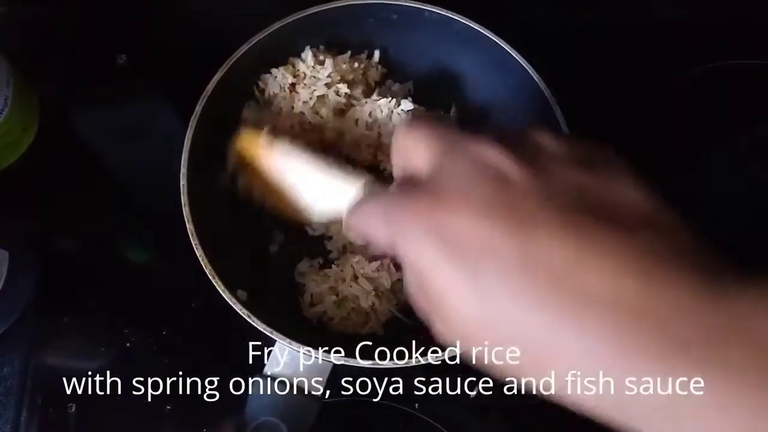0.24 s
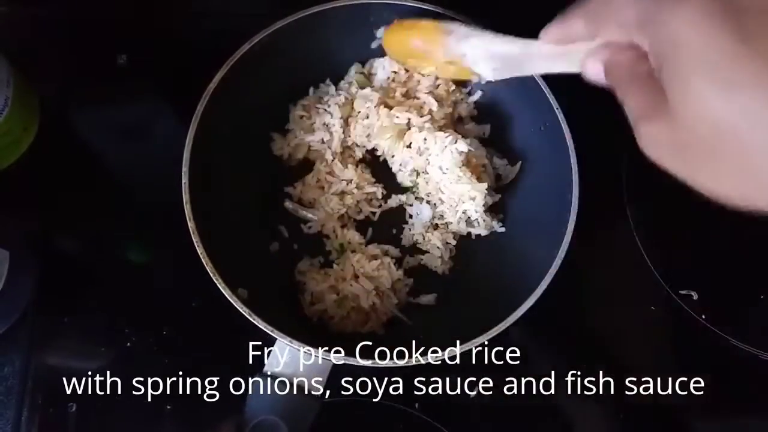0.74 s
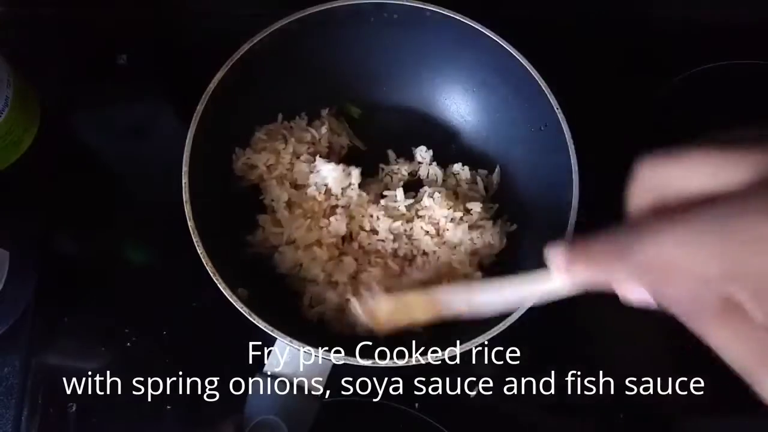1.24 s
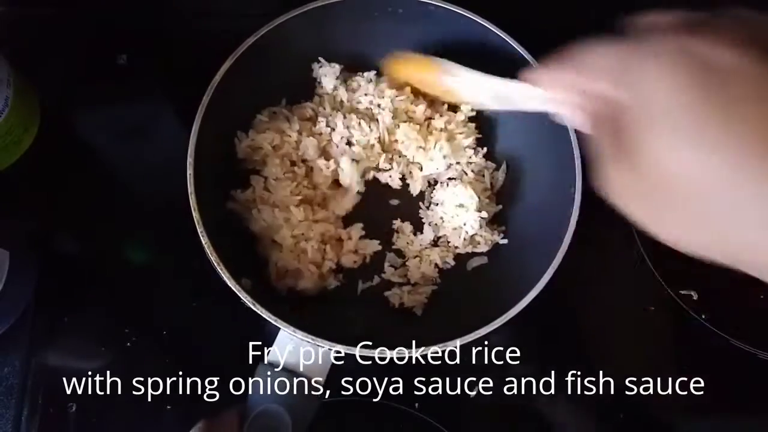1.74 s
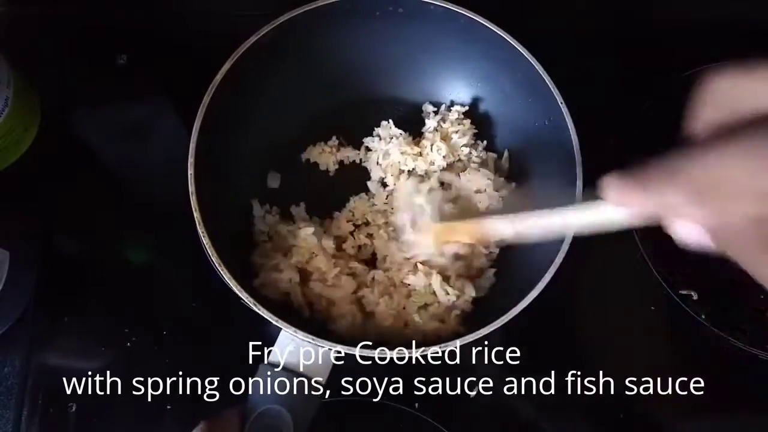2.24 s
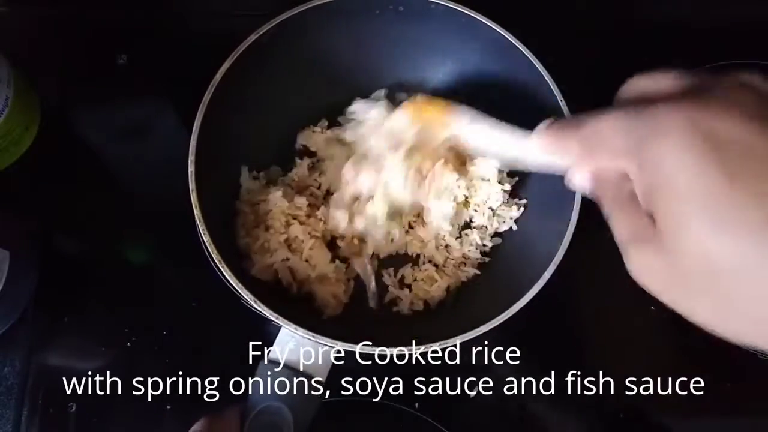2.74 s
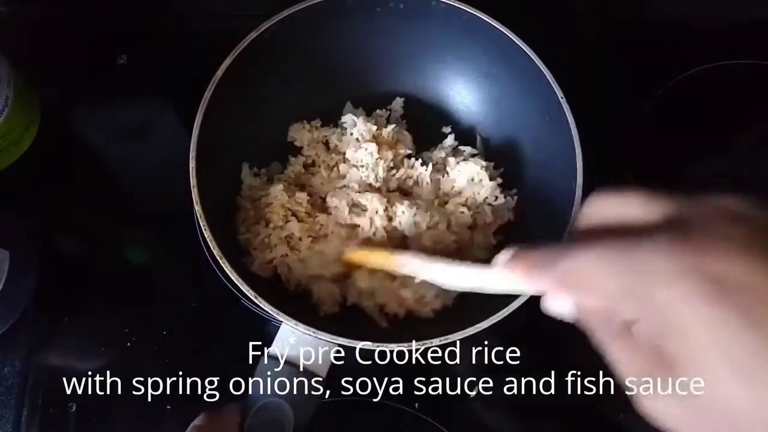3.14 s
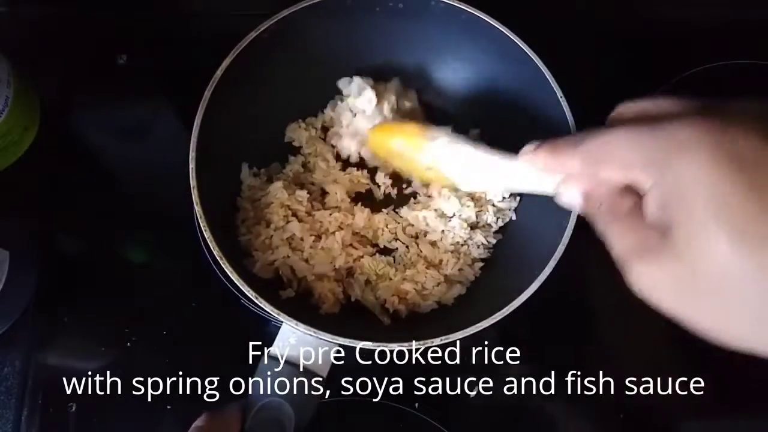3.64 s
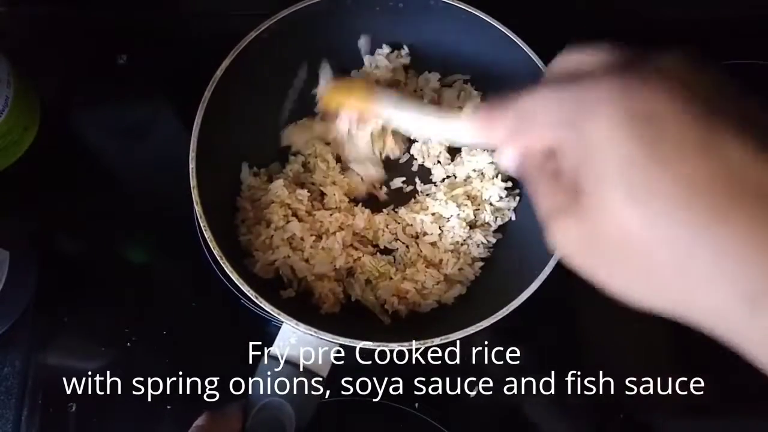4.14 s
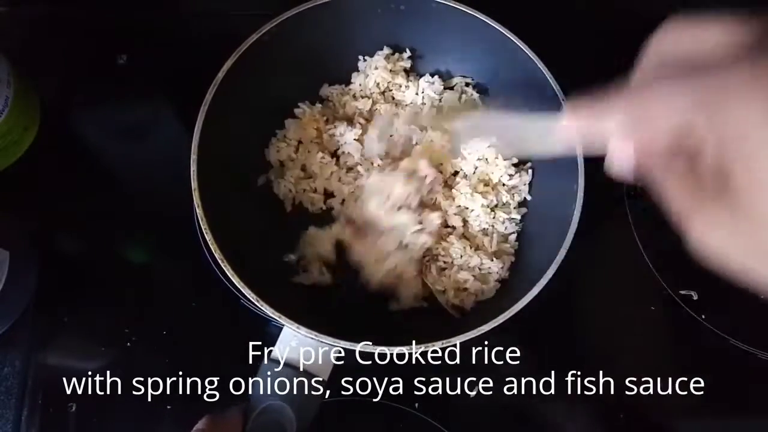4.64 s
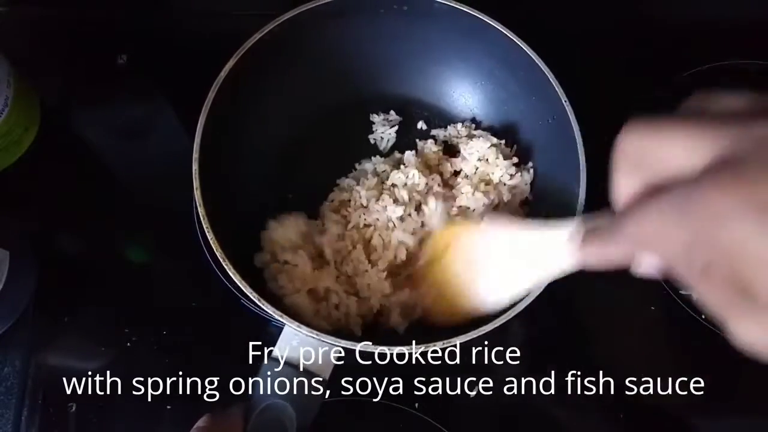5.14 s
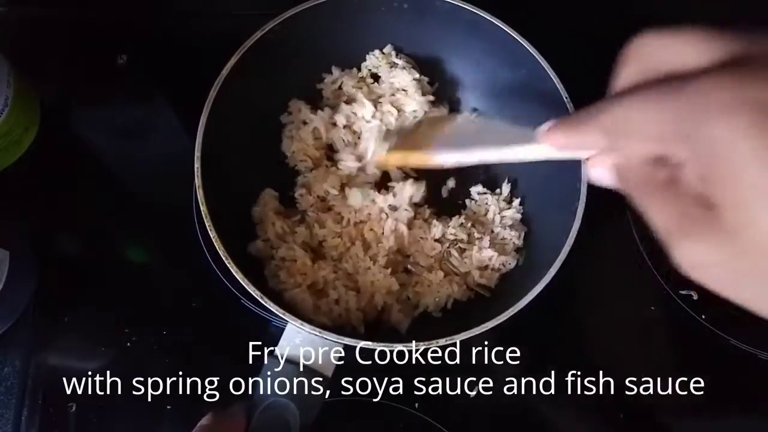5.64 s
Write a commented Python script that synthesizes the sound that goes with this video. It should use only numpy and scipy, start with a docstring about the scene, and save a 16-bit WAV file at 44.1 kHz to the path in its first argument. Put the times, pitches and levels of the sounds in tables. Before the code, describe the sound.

A wooden spatula stirs moist rice in a non-stick pan, heard close by in a small kitchen. The rice crackles softly, swelling with each push, while the hob's fan hums faintly. The blade gives a slight squeak, sticky clumps snap, and wood knocks and judders against the pan. Two harder knocks come with short scrapes, then the stirring goes on more gently until the loudest cluster of knocks near the end.

```python
"""A wooden spatula turns rice in a non-stick pan, heard close by in a small kitchen.
From the start the hob's fan hums faintly and moist rice crackles, swelling with each push of the blade.
The blade squeaks on the coating, a sticky clump snaps, then wood knocks the pan and judders as it drags.
Harder knocks with short scrapes follow near 1.6 and 2.6 s. The turning goes on more gently until the
loudest cluster of knocks near 5.6 s; the kitchen answers each one."""
import sys
import numpy as np
from scipy import signal
from scipy.fft import rfft, irfft, next_fast_len
from scipy.io import wavfile
from scipy.ndimage import map_coordinates

SR = 44100
rng = np.random.default_rng(int(sys.argv[2]) if len(sys.argv) > 2 else 0)


def dump_mix(stems):
    """Bounce the given channels to the path in sys.argv[1] as a 16-bit WAV at rate SR."""
    frames = np.atleast_2d(stems).T  # one column per channel
    limited = np.clip(frames, -1, 1)  # hard clip at full scale
    pcm = np.round(limited * 32767).astype(np.int16)
    wavfile.write(sys.argv[1], SR, pcm)


N = 260631

# The spatula meets the pan. Each row: start in seconds, relative level of the clonk in dB,
# then thump, clack and click in dB against that clonk.
KNOCKS = [(0.388, -46, 10.5, -22, -11.5), (1.134, -60.5, 12.5, -11, -7), (1.542, -27.5, -1, -5.5, -6.5),
          (1.589, -46, 11.5, 7, 1), (1.988, -41.5, 3, -14.5, -30), (2.59, -25.5, -7, -8.5, -14),
          (2.613, -27.5, 0, -13, -11), (2.924, -41.5, -2, -21, -19.5), (3.37, -57.5, 16.5, -17, -5.5),
          (3.87, -32.5, -2.5, -30, -27), (4.042, -55, 10, -17, -11), (4.985, -34.5, -1.5, -13, -23.5),
          (5.077, -53.5, 7.5, -24, -24), (5.097, -48.5, 0.5, -27, -24), (5.379, -31, 1.5, -11.5, -21),
          (5.623, -21, -6, -9, -6.5), (5.64, -27.5, -0.5, -5, -9.5), (5.692, -35, 0, -16, -23),
          (5.731, -38, 8.5, -9.5, -6.5)]


def amp(db):
    """Decibels to gain."""
    return 10 ** (np.asarray(db) / 20)


def unit(x):
    """Scale to rms 1."""
    return x / np.sqrt(np.mean(x ** 2) + 1e-20)


def along(points, hz):
    """Read a curve of (Hz, value) points on a log frequency axis."""
    freqs, values = np.transpose(points)
    return np.interp(np.log(hz + 1), np.log(freqs + 1), values)


def wobble(rate):
    """A smooth random curve with `rate` knots a second."""
    return map_coordinates(rng.standard_normal(int(N * rate / SR) + 4), [np.arange(N) * rate / SR])


def filtered(x, response):
    """Equalise x with a gain given as a function of frequency."""
    size = next_fast_len(len(x) + 8192)
    return irfft(rfft(x, size) * response(np.fft.rfftfreq(size, 1 / SR)), size)[:len(x)]


def coloured(x, spectrum):
    """Shape x with a curve of (Hz, dB) points, at rms 1."""
    return unit(filtered(x, lambda hz: amp(along(spectrum, hz))))


def narrow_noise(centre_hz, width_hz):
    """Noise through one resonance, at rms 1."""
    noise = rng.standard_normal(N)
    return unit(filtered(noise, lambda hz: 1 / (1 + (2 * (hz - centre_hz) / width_hz) ** 2)))


def swelling(peak_s, half_s):
    """A bell-shaped rise and fall."""
    return np.exp(-np.minimum(((np.arange(N) / SR - peak_s) / half_s) ** 2, 20))


def grains(size, rate, spread_db):
    """Random impulses of unequal size, about `rate` a second."""
    hit = rng.random(size) < rate / SR
    return hit * rng.choice([-1, 1], size) * amp(spread_db * np.minimum(rng.exponential(size=size), np.pi))


def add(track, start_s, sound):
    """Mix a sound into the track."""
    part = track[max(round(start_s * SR), 0):][:len(sound)]
    part += sound[:len(part)]


def hob(fan_db=-66, whirr_db=-78, drift_rad=0.27):
    """The cooling fan: a faint unsteady hum, a soft rush of air and a whirr in its duct."""
    # The hum's tones. Each row: frequency in Hz, rms level in dB.
    tones = [(199.2, -92), (279.9, -85.5), (559.9, -87.5), (640.6, -109), (1281, -95)]
    # The colour of the rushing air. Each row: frequency in Hz, relative level in dB.
    air_colour = [(15, -56), (25, -22.5), (49, -12.5), (102, 1.5), (165, -18.5), (188, -18), (281, -14),
                  (306, -19), (439, -20.5), (521, -34.5), (631, -17.5), (1050, -25), (1510, -29.5),
                  (2910, -40.5), (4000, -34), (5200, -43), (8800, -120)]
    t = np.arange(N) / SR
    hum = sum(amp(db) * np.sqrt(2) * np.sin(2 * np.pi * hz * t + drift_rad * wobble(6.8))
              for hz, db in tones)
    rush = amp(fan_db) * coloured(rng.standard_normal(N), air_colour)
    whirr = amp(whirr_db) * narrow_noise(centre_hz=650, width_hz=60)
    return rush + hum + whirr


def stirring(rest_db=-74, waver_db=1, attack_s=0.017, heap_db=9.5, settle_db_per_s=110):
    """The rice's envelope: it builds as grains heap up before the blade, then settles to a sizzle."""
    # Pushes through the rice. Each row: start in seconds, length in seconds, gain at the end in dB.
    strokes = [(0.01, 0.024, -68), (0.373, 0.041, -56.5), (0.581, 0.54, -63), (1.594, 0.11, -58.5),
               (1.976, 0.073, -60), (2.264, 0.086, -71), (2.88, 0.12, -70), (3.054, 0.12, -68),
               (3.4, 0.34, -67), (4.554, 0.27, -67), (4.986, 0.14, -64.5), (5.356, 0.04, -63)]
    t = np.arange(N) / SR
    power = amp(rest_db + waver_db * wobble(6.7)) ** 2
    for start, length, db in strokes:
        entered = np.clip((t - start) / attack_s, 0, 1)
        to_go = np.clip(1 - (t - start) / length, 0, 1)
        since_end = np.maximum(t - start - length, 0)
        power += (entered * amp(db - heap_db * to_go - settle_db_per_s * since_end)) ** 2
    return np.sqrt(power)


def rice(crackle_db=-3, hiss_db=-2.5, peel_t60_s=0.01):
    """Moist grains peel apart in tiny bursts and sizzle, more as the spatula turns them."""
    # The colour of crackle and hiss. Each row: frequency in Hz, relative level in dB.
    rice_colour = [(880, -19), (1500, -11.5), (1920, -35), (2600, -9.5), (3080, -13.5), (6140, -3),
                   (7180, 3), (7850, -2.5), (8840, -2), (11800, -8), (15000, -9), (15800, -7.5)]
    peel = amp(-60 * np.arange(SR // 50) / SR / peel_t60_s)
    burst_power = signal.fftconvolve(grains(N, rate=450, spread_db=4.6) ** 2, peel ** 2)[:N]
    crackle = coloured(np.sqrt(abs(burst_power)) * rng.standard_normal(N), rice_colour)
    hiss = coloured(rng.standard_normal(N), rice_colour)
    return stirring() * (amp(crackle_db) * crackle + amp(hiss_db) * hiss)


def squeaks():
    """The blade rubs the coating: a faint, narrow band of friction noise swells and fades."""
    # Each row: peak time in seconds, half length in seconds, pitch in Hz, bandwidth in Hz, level in dB.
    rubs = [(0.214, 0.11, 4760, 1310, -74), (1.326, 0.025, 3730, 240, -72.5)]
    out = np.zeros(N)
    for peak_s, half_s, hz, width_hz, db in rubs:
        out += amp(db) * swelling(peak_s, half_s) * narrow_noise(hz, width_hz)
    return out


def ticks(level_db=-5, attack_s=0.00093, t60_s=0.046):
    """A sticky clump of rice lets go with a short, bright snap."""
    # The biggest clumps. Each row: start in seconds, relative level in dB.
    clumps = [(0.278, -38.5), (0.442, -39.5), (1.641, -41.5), (2.142, -50), (2.2584, -53), (2.2784, -47.5),
              (2.841, -43.5), (3.252, -55), (3.8347, -52.5), (4.041, -44.5), (4.357, -61), (4.445, -55.5),
              (4.569, -61), (5.2417, -41), (5.857, -42)]
    # The colour of a snap. Each row: frequency in Hz, relative level in dB.
    snap_colour = [(710, -10), (1200, -13.5), (2220, -19.5), (4020, -12.5), (4380, -10), (5320, -2.5),
                   (6600, 1), (11900, -6), (13000, -3.5), (15800, -18)]
    out, t = np.zeros(N), np.arange(SR // 6) / SR
    for start, db in clumps:
        envelope = amp(db + level_db - 60 * t / t60_s) * (1 - np.exp(-t / attack_s))
        add(out, start, envelope * coloured(rng.standard_normal(len(t)), snap_colour))
    return out


def pan_ring(t, clatter_db, clatter_t60, vary_db, ring_share=1, tilt_db_per_octave=0, swell_cycles=0.71):
    """One blow rings the pan's modes, each at a fresh strength, over a short dense clatter."""
    # The pan on its glass top. Each row: frequency in Hz, relative level in dB, free t60 in seconds.
    pan_modes = [(101.5, -11, 0.39), (159.6, -10, 0.29), (261.1, 7, 0.15), (330.5, 0.5, 0.066),
                 (377.7, 1.5, 0.1), (423.3, -5, 0.14), (638.5, -5, 0.17), (722, 6.5, 0.084),
                 (768.5, 1.5, 0.1), (843, -9, 0.066), (967, -21, 0.066), (1124, -13.5, 0.16),
                 (1214, -17, 0.062), (1506, 1.5, 0.074), (1526, 0, 0.048), (1998, -11.5, 0.11),
                 (2237, -16, 0.22), (2734, -7.5, 0.067), (3083, -11.5, 0.074), (3670, -24, 0.19),
                 (4005, -16, 0.097), (5230, -7, 0.11), (5840, -18, 0.12), (5980, -14, 0.09),
                 (6420, -11, 0.12), (6820, -7, 0.16), (7390, -13, 0.14), (8180, -8, 0.16),
                 (8720, -10, 0.13)]
    # Dense resonances of pan, spatula and hob. Each row: frequency in Hz, relative level in dB.
    clatter_colour = [(60, -51), (130, -27), (260, 0), (400, -7), (520, -29.5), (740, 10.5), (1200, -9.5),
                      (2800, -14.5), (4200, -18.5), (6000, -12), (8600, -17), (10500, -26.5), (15500, -43)]
    hz, db, t60 = np.transpose(pan_modes)[:, :, None]
    tilt = lambda f: tilt_db_per_octave * np.log2(f / SR)
    polarity = rng.choice([-1, 1], hz.shape)
    strength = polarity * amp(db + tilt(hz) + vary_db * rng.standard_normal(hz.shape))
    swell = 1 - np.exp(-hz * t / swell_cycles)  # the low modes are the slowest to speak
    decay = amp(-60 * t / (t60 * ring_share))
    modes = np.sum(strength * swell * decay * np.sin(2 * np.pi * hz * t), axis=0)
    clatter = coloured(rng.standard_normal(len(t)), clatter_colour)
    clatter = filtered(clatter, lambda f: amp(tilt(f + hz[0])))
    return modes + amp(clatter_db - 60 * t / (clatter_t60 * ring_share)) * clatter


def knocks(level_db=-6, bare_db_per_octave=0.89, damped_ring=0.63):
    """Wood hits the pan: bright when bare, a thump when rice cushions it; the blade damps the ring."""
    out, t = np.zeros(N), np.arange(SR // 4) / SR
    bands_hz = [(70, 500), (500, 1330), (1330, 3600), (3600, 14000)]  # thump, clonk, clack, click
    registers = [signal.butter(7, band, 'band', fs=SR, output='sos') for band in bands_hz]
    for start, db, thump, clack, click in KNOCKS:
        tilt = bare_db_per_octave - 0.26 * thump  # more thump, duller blow
        blow = pan_ring(t, clatter_db=6, clatter_t60=0.12, vary_db=3.0,
                        ring_share=damped_ring, tilt_db_per_octave=tilt)
        for register, band_db in zip(registers, [thump, 0, clack, click]):
            part = signal.sosfilt(register, blow)
            attack_rms = np.std(part[:SR // 50])
            add(out, start, amp(level_db + db + band_db) * part / attack_rms)
    return out


def drags(level_db=-6, waver=0.0455, shudder=0.21, skid_delay_s=0.029, skid_hz=101.2, skid_half_s=0.027):
    """Wood sticks and slips on the coating and shakes the pan near its lowest resonance."""
    # Each row: peak time in seconds, relative level in dB, slip rate in Hz, half length in seconds.
    judders = [(0.814, -46.5, 110, 0.07), (1.04, -47.5, 110, 0.029), (1.641, -39, 102, 0.04),
               (1.67, -40.5, 223, 0.046), (2.702, -40, 108, 0.022), (3.003, -44, 108, 0.044),
               (3.46, -50.5, 100, 0.18), (3.726, -43, 95, 0.039), (4.06, -42.5, 100, 0.037)]
    # The rumble of uneven slips. Each row: frequency in Hz, relative level in dB.
    rumble_colour = [(70, -60), (110, 0), (150, -9.5), (190, -20.0), (260, -11.0), (400, -34.5)]
    wavering_time = np.cumsum(1 + waver * wobble(30)) / SR
    rumble = shudder * coloured(rng.standard_normal(N), rumble_colour)
    # The blade also skids after every knock, a little louder after a hard one.
    skids = [(start + skid_delay_s, -39 + 0.12 * db, skid_hz, skid_half_s) for start, db, *_ in KNOCKS]
    out = np.zeros(N)
    for peak_s, db, hz, half_s in judders + skids:
        judder = np.sin(2 * np.pi * hz * wavering_time) + rumble
        out += amp(db + level_db) * swelling(peak_s, half_s) * judder
    return out


def scrapes(slips_per_s=900):
    """After a blow the edge scrapes on, catching and slipping; each slip rings the pan."""
    # Each row: start in seconds, length in seconds, level in dB.
    slides = [(1.555, 0.052, -43.5), (2.594, 0.031, -38), (5.658, .06, -46.5)]
    out, t = np.zeros(N), np.arange(SR // 4) / SR
    for start, length, db in slides:
        size = int(length * SR)
        slips = grains(size, slips_per_s, spread_db=-1.5)
        scrape = signal.fftconvolve(slips, pan_ring(t, clatter_db=12, clatter_t60=0.085, vary_db=1.5))
        add(out, start, amp(db) * scrape / np.std(scrape[:size]))
    return out


def kitchen(x, predelay_s=0.007):
    """Short reflections from worktop and walls; deep bass and high treble die first."""
    # The room's decay. Each row: frequency in Hz, t60 in seconds.
    decay_times = [(100, 0.081), (300, 0.28), (700, 0.27), (5000, 0.32), (14000, 0.19)]
    hz, t, noise = signal.stft(rng.standard_normal(SR // 2), SR, nperseg=256)
    decay = amp(-60 * t / along(decay_times, hz)[:, None])
    tail = signal.istft(noise * decay, SR, nperseg=256)[1]
    delayed = np.pad(x, (int(predelay_s * SR), 0))
    return signal.fftconvolve(delayed, tail / np.linalg.norm(tail))[:N]


def scene(pan_room_db=-8, rice_room_db=-7, send_highpass_hz=400):
    """Pan and rice with the kitchen's reverb, over dry judder and fan, in mono."""
    pan = knocks() + scrapes() + squeaks()
    food = rice() + ticks()
    # A small pan sends little bass to the walls.
    pan_send = signal.sosfilt(signal.butter(1, send_highpass_hz, 'high', fs=SR, output='sos'), pan)
    room = amp(pan_room_db) * kitchen(pan_send) + amp(rice_room_db) * kitchen(food)
    return (pan + food + room + drags() + hob())[None]


def record(dry, top_hz=15850):
    """A brick-wall low-pass takes off the very top."""
    return np.array([filtered(channel, lambda hz: hz < top_hz) for channel in dry])


dry = scene()
out = record(dry)
dump_mix(out)
```